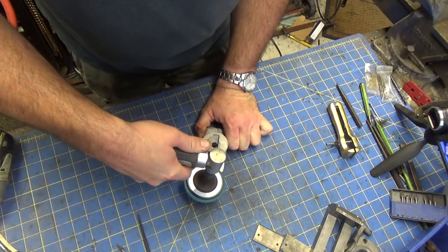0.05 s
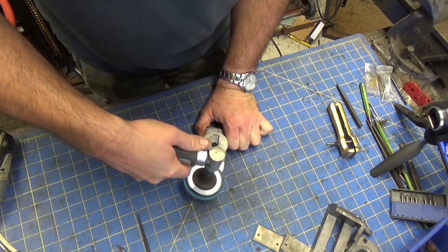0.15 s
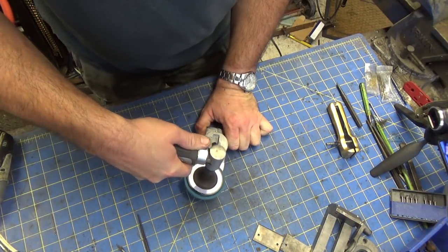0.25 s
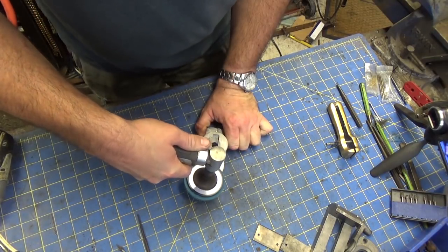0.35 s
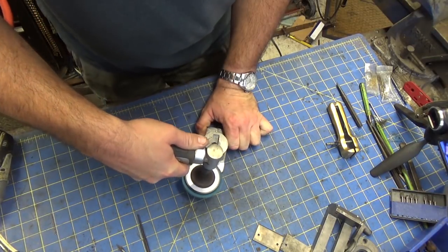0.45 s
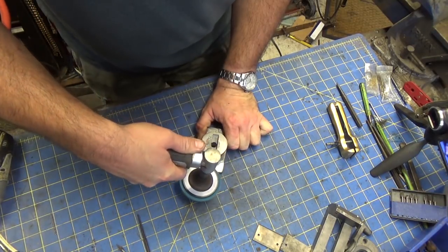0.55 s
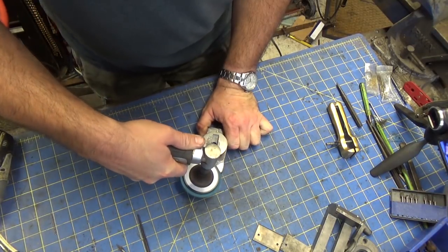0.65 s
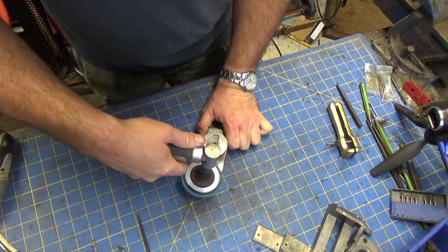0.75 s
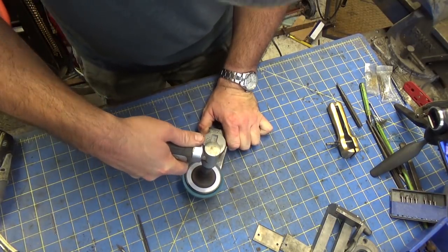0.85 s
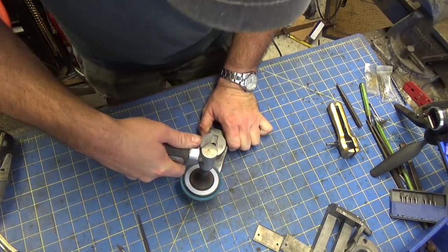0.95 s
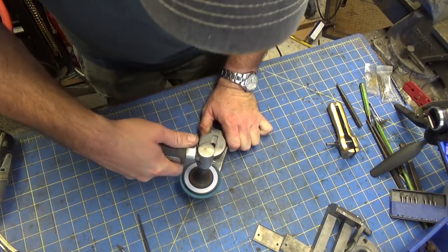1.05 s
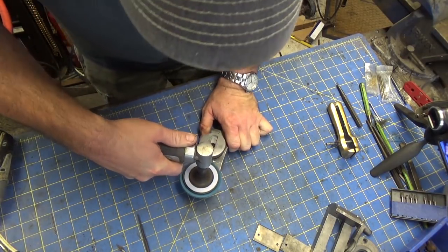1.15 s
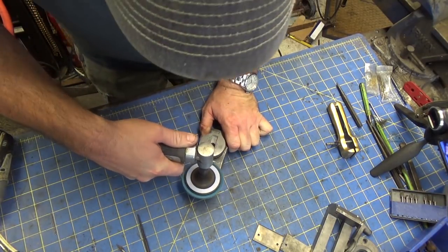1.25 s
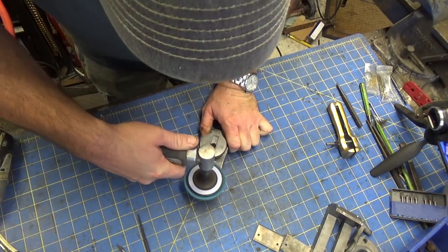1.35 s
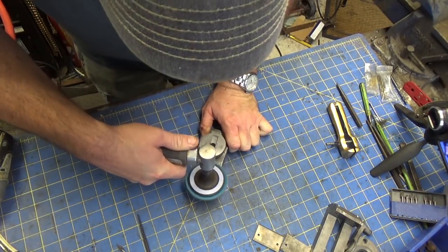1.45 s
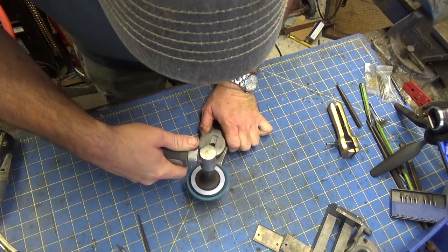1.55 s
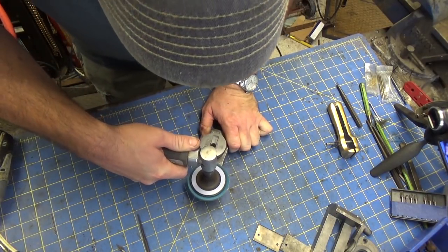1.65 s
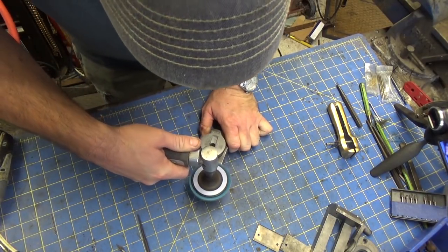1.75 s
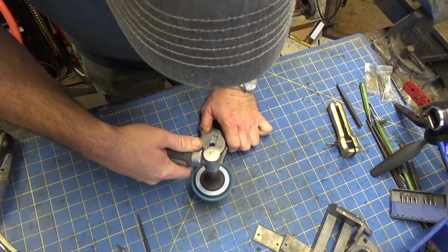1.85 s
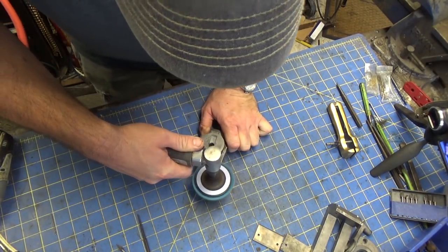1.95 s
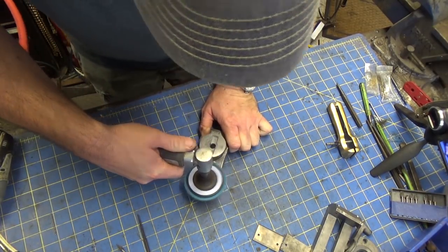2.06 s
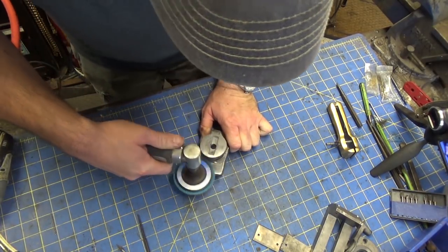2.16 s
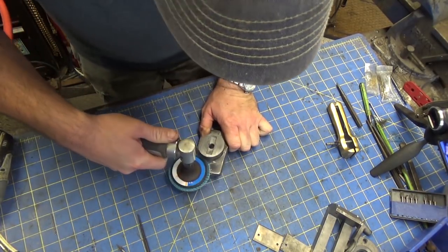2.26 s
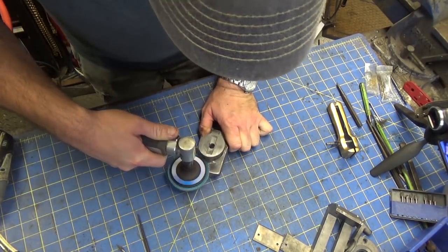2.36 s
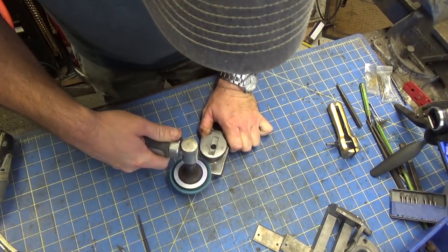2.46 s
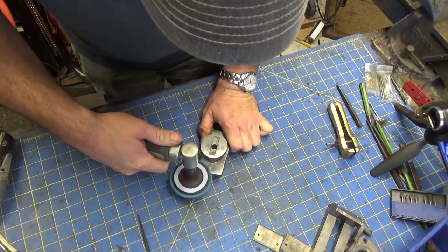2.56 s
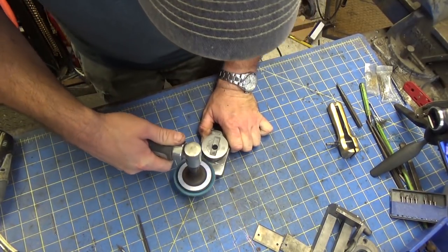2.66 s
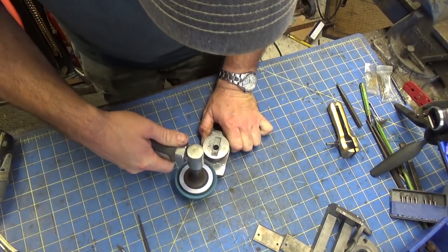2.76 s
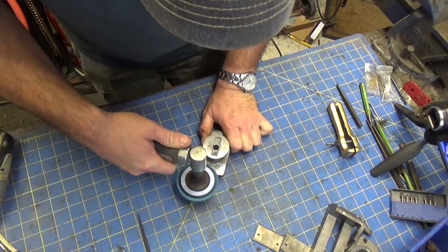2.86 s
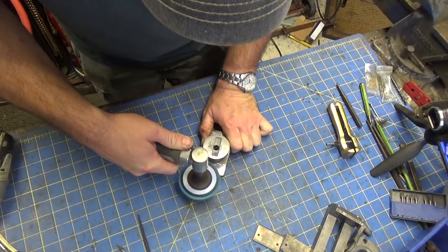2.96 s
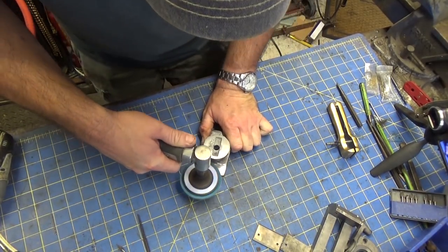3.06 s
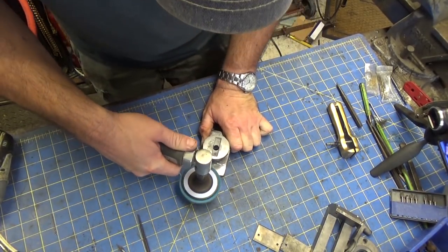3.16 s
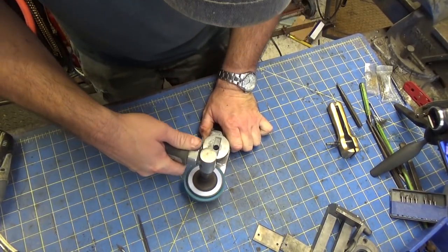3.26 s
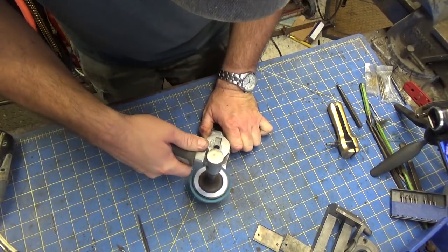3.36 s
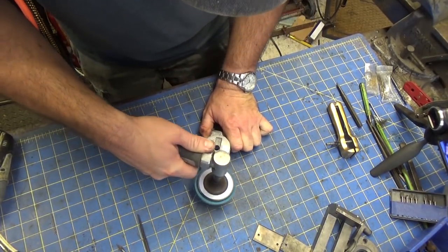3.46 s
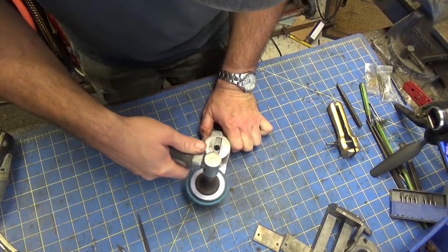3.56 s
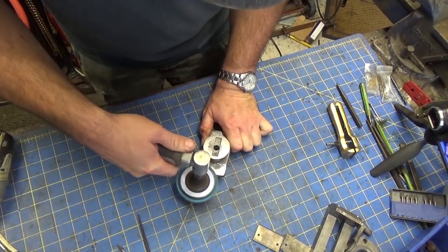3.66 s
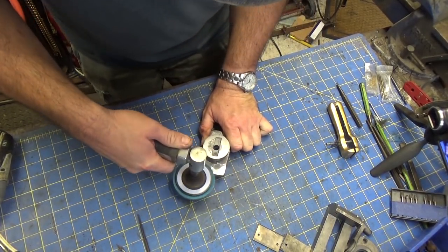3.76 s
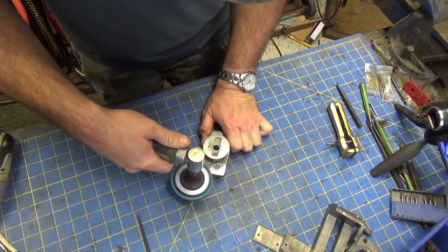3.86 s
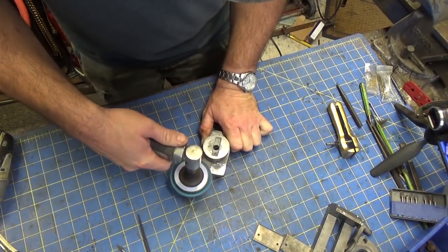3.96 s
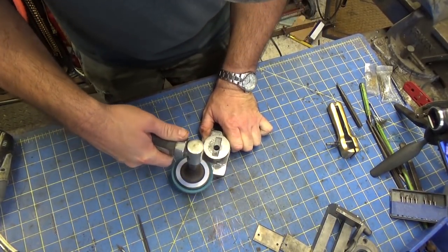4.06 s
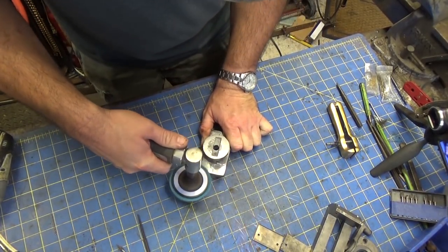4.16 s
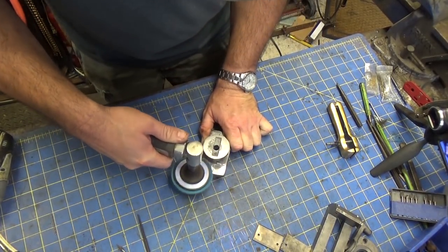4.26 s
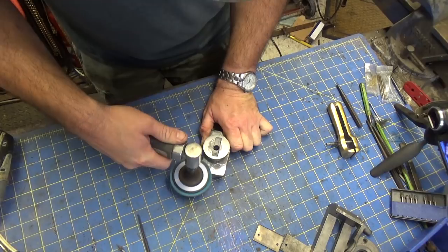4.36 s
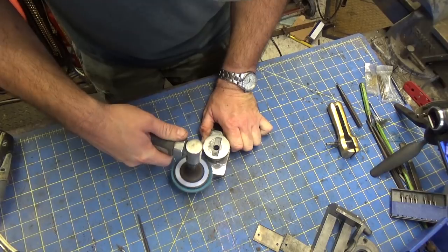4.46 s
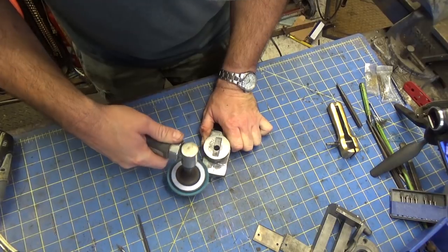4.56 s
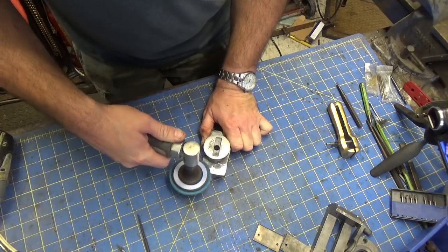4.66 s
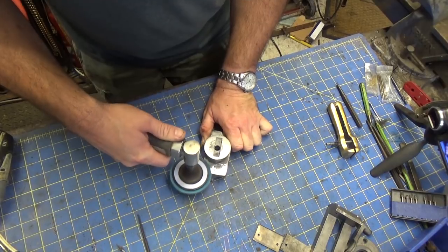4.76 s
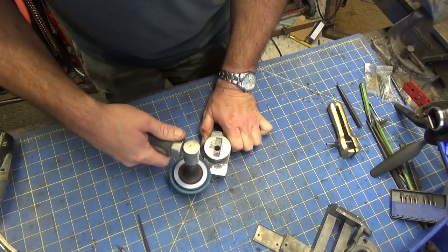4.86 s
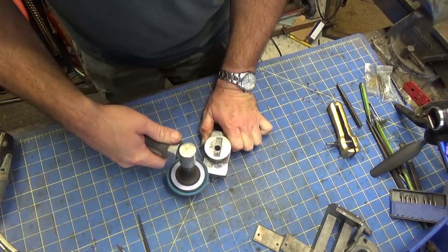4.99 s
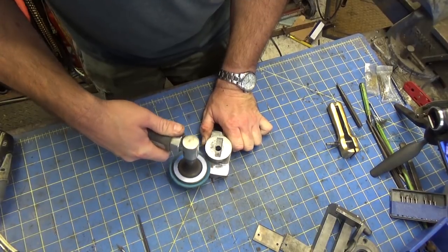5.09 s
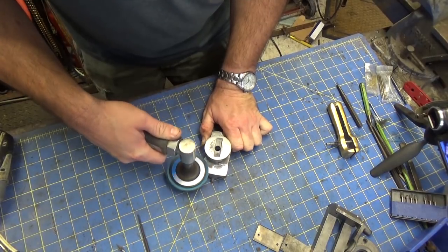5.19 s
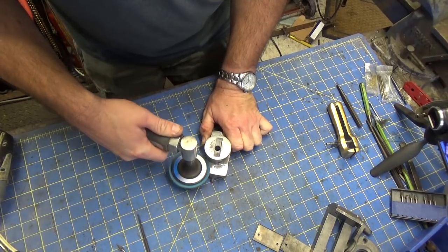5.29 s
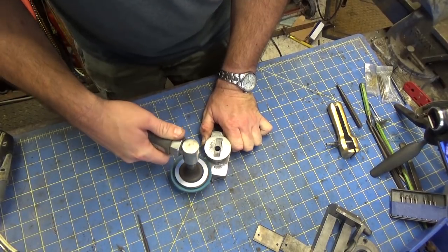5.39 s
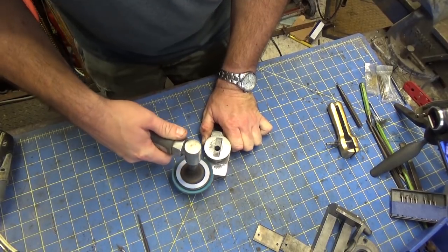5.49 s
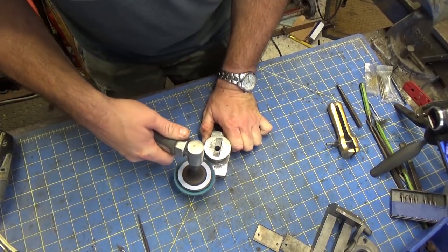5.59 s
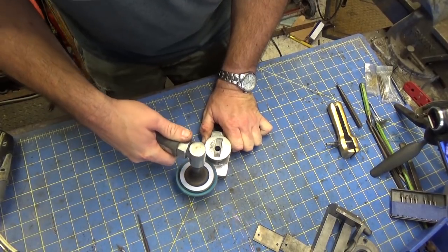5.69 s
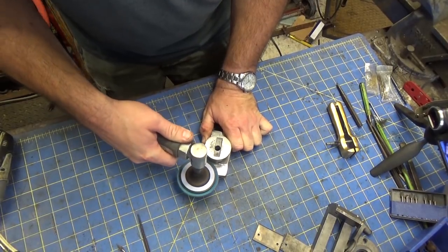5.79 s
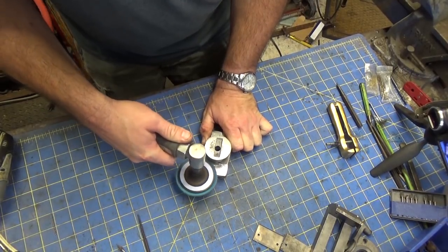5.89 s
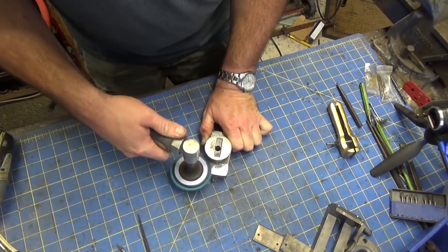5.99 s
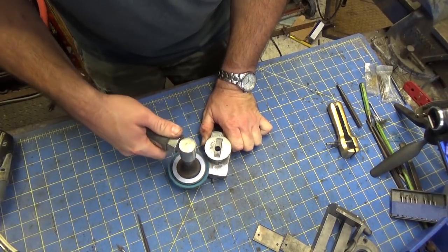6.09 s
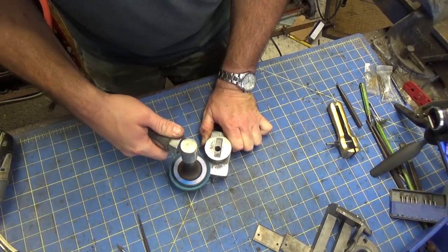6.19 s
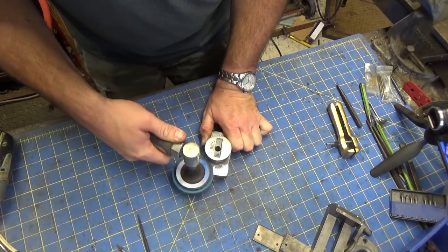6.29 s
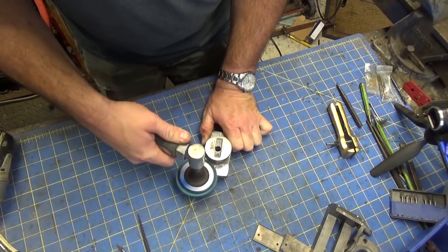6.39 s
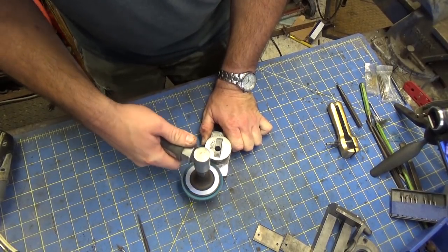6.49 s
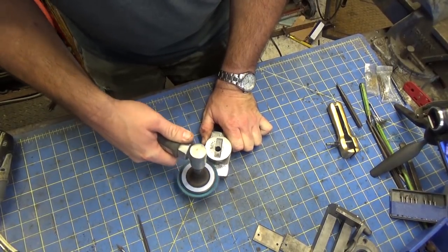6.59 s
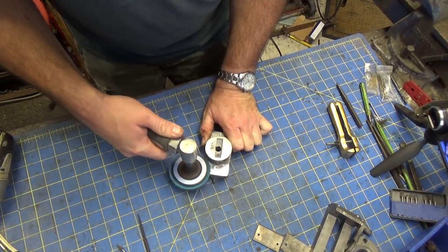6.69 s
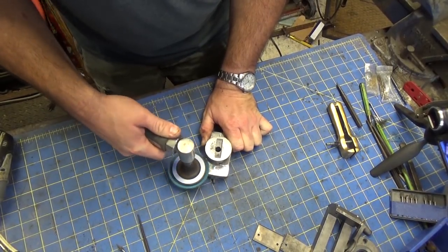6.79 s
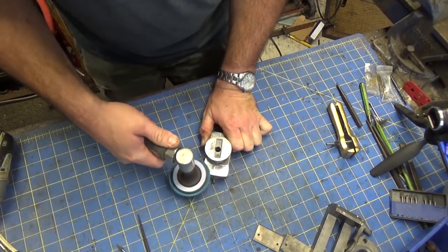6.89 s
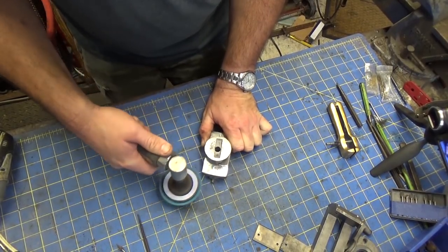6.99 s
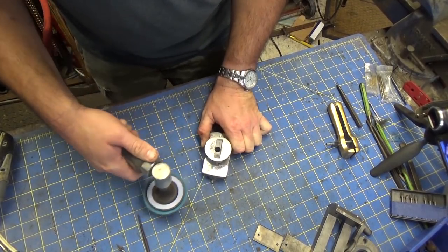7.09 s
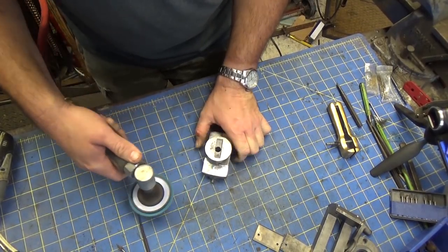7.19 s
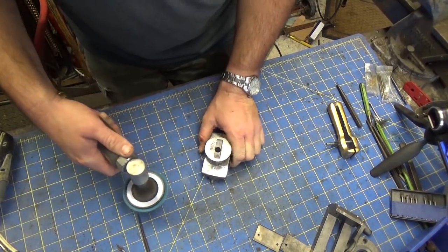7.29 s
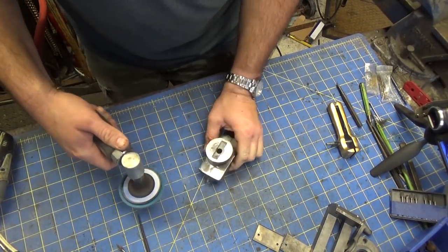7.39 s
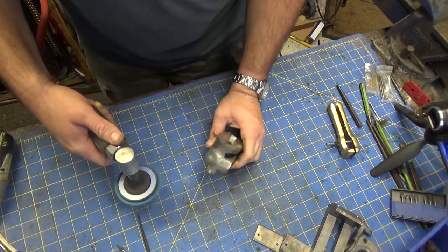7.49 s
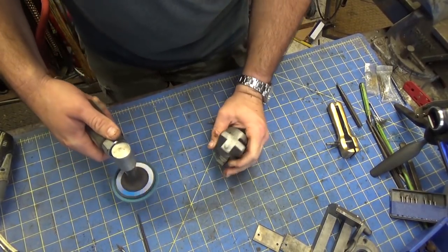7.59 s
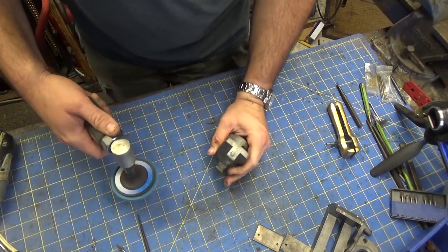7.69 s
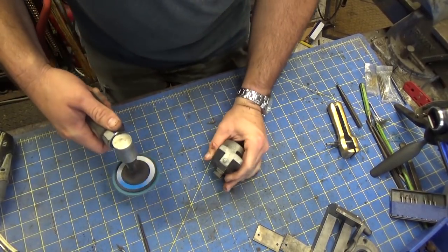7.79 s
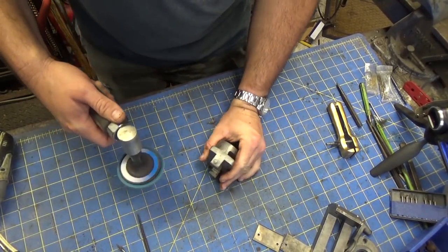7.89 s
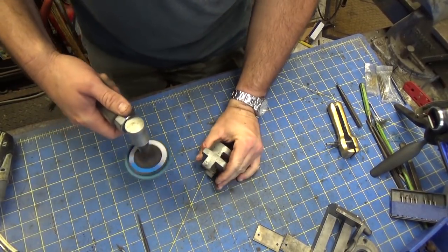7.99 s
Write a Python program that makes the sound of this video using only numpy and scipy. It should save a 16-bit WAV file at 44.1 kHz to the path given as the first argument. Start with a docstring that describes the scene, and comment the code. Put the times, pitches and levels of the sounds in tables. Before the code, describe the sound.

A handheld air grinder hisses loudly and whines, its pitch sagging under load and recovering, then the air shuts off and it rattles down.

```python
"""An air die grinder works a small casting on a bench: its exhaust hisses as filtered noise chopped by the vanes.
The vane motor whines in sine orders of its vane rate, which sags and nearly stalls under load.
The valve shuts and the rotor coasts down: loose vanes rattle as pulsed noise through housing resonances,
with a brief squeal. The steady hum of the workshop, shaped noise, is left. A short room tail surrounds it."""
import sys
import numpy as np
from scipy import signal
from scipy.fft import rfft, irfft, next_fast_len
from scipy.io import wavfile
from scipy.ndimage import uniform_filter1d, map_coordinates

SR = 44100
rng = np.random.default_rng(int(sys.argv[2]) if len(sys.argv) > 2 else 0)


def file_out(sig):
    """Save sig as 16-bit WAV at sys.argv[1]."""
    # one column per channel
    cols = np.atleast_2d(sig).T
    # limit, then scale
    lim = np.clip(cols, -1, 1)
    pcm = np.round(lim * 32767).astype(np.int16)
    wavfile.write(sys.argv[1], SR, pcm)


N = 354547
TIME_S = np.arange(N) / SR
SHUT_S = 7.11  # the valve closes


def amp(db):
    """Decibel law: 20 dB is a factor of ten in amplitude."""
    return 10 ** (np.asarray(db) / 20)


def unit(x):
    """Normalization: scale to a root-mean-square of 1."""
    return x / np.sqrt(np.mean(x ** 2) + 1e-20)


def along(points, hz):
    """Spectral interpolation: (frequency, value) points joined on a log-frequency axis."""
    f, v = np.transpose(points)
    return np.interp(np.log(hz + 1), np.log(f + 1), v)


def curves(rows):
    """Linear interpolation in time: one value per sample for each column after the time."""
    s, *cols = np.transpose(rows)
    return [np.interp(TIME_S, s, c) for c in cols]


def wobble(rate):
    """Slow random modulation: a smooth curve through rate random knots a second."""
    at = np.arange(0, N + 32, 32)
    knots = rng.standard_normal(int(N * rate / SR) + 4)
    return np.interp(np.arange(N), at, map_coordinates(knots, [at * rate / SR]))


def filtered(x, response):
    """Linear filtering: the spectrum is multiplied by a response of frequency."""
    m = next_fast_len(N + SR // 2)
    return irfft(rfft(x, m) * response(np.fft.rfftfreq(m, 1 / SR)), m)[..., :N]


def band(f, hz, width_hz):
    """Damped resonance: a second-order response with peak gain 1."""
    return 1j * f * width_hz / (hz * hz - f * f + 1j * f * width_hz)


def puffs(turn, depth):
    """Periodic flow modulation: white noise swells once per vane pass."""
    return unit(rng.standard_normal(N) * np.exp(depth * np.cos(turn)))


def raised(slow, carrier):
    """Quadrature modulation: two low-passed noises become one noise band around the carrier."""
    return unit(slow[0] * np.cos(carrier) + slow[1] * np.sin(carrier))


def coasting():
    """Valve switching: 0 under air, 1 once the valve has shut, with a 43 ms ramp."""
    return np.clip((TIME_S - SHUT_S) / 0.043, 0, 1)


def streaked(x, depth_db):
    """Shifting reflections off bench, tools and hands: narrow bands swell and fade."""
    z = signal.stft(x, nperseg=512)[2]
    field = uniform_filter1d(rng.standard_normal(z.shape), size=3, axis=0)
    field = uniform_filter1d(field, size=70, axis=1)
    field = uniform_filter1d(field, size=25, axis=1)
    field = field - uniform_filter1d(field, size=14, axis=0)  # broad colour stays as it is
    return signal.istft(z * amp(depth_db * unit(field)), nperseg=512)[1][:N]


# The vane motor sags and recovers as the brush is pressed and eased, before small random snags:
# time_s, vane_rate_hz
MOTOR_SPEED = [(0.0, 495), (0.15, 295.3), (0.26, 311), (0.3, 254.0), (0.41, 261.8), (0.47, 304.7),
               (0.5, 233.7), (0.68, 408.3), (0.81, 533.5), (0.9, 533.0), (1.05, 589.6), (1.14, 607),
               (1.24, 592.0), (1.33, 529), (1.39, 516), (1.5, 342.7), (1.61, 342.6), (1.67, 431),
               (1.8, 374), (1.95, 456.0), (2.06, 479.0), (2.12, 444), (2.17, 378.0), (2.29, 124.0),
               (2.4, 111.0), (2.44, 153.6), (2.51, 165.9), (2.61, 414.0), (2.7, 541.5), (2.94, 534.3),
               (3.02, 616), (3.11, 541.0), (3.22, 472), (3.32, 520), (3.37, 514.0), (3.47, 544),
               (3.58, 609), (3.73, 552), (3.77, 550.0), (3.88, 568.5), (4.01, 633), (4.18, 591),
               (4.35, 634.5), (4.55, 623.0), (4.61, 560.0), (4.7, 500), (4.78, 553), (4.82, 458.0),
               (4.91, 418), (4.97, 454), (5.02, 392.0), (5.06, 398), (5.15, 335), (5.17, 349),
               (5.21, 172.0), (5.3, 135.5), (5.42, 174.0), (5.49, 267), (5.55, 281.0), (5.64, 379.0),
               (5.7, 442.0), (5.81, 481), (5.86, 452), (5.92, 523.0), (6.02, 536), (6.05, 523.0),
               (6.15, 380.7), (6.22, 352.0), (6.27, 241.3), (6.46, 218.6), (6.58, 335.5), (6.67, 427),
               (6.8, 313.5), (6.88, 300.0), (7.01, 435), (7.08, 619), (7.12, 684)]
COAST_S, COAST_BEND = .42, .93  # time to fall by 1/e without air; a bend under 1 is faster at first


def rotor():
    """Rotor dynamics: vane rate and its running phase, loaded under air, then a free run-down."""
    free_s = np.clip(TIME_S - MOTOR_SPEED[-1][0], 0, None)
    hz = curves(MOTOR_SPEED)[0] * np.exp(-(free_s / COAST_S) ** COAST_BEND)
    hz = hz * (1 + 0.00596 * wobble(60))  # the brush snags and frees
    return hz, 2 * np.pi * np.cumsum(hz) / SR


# Bands of the exhaust jet, levels relative: centre_hz, width_hz, level_db, speed_db_per_octave,
# drift_db_per_step, sheen_db_per_step, flare_db
JET_BANDS = [(4023, 830, -38, -1.5, 5.5, 3, 5), (5796, 2900, -31, 1, -4.5, -0.7, 2),
             (8616, 1160, -24, -.6, 2, 1.5, 10), (9640, 1730, -19, 1.4, 0.3, -2, -3),
             (10960, 1730, -23, 1.5, -1.5, 3, .1), (13280, 1400, -33, 1.5, 1, 5, -4),
             (14600, 1100, -37.5, 1, -7, -5.5, .1)]
# Upper bands slide as the paths off bench and body change: time_s, pitch_factor
JET_SLIDE = [(0, 0.95), (.9, 0.95), (1.5, 1.02), (2.1, 1.01), (2.5, 0.97), (3.3, 1.03), (4.4, 1.0),
             (5.3, 1.015), (6.2, 1.1), (7.1, 0.92)]
# Air let through by the valve, relative: time_s, flow_db
VALVE_FLOW = [(0, 1.5), (6.95, 1), (7.03, 1.5), (7.104, -1), (7.113, -10), (7.13, -27), (7.17, -25),
              (7.25, -26.5), (8.04, -53)]
# Tool and hands move and the jet's colour drifts, toward hollow and in the top bands:
# time_s, drift_steps, sheen_steps
JET_AIM = [(0, -0.78, -0.5), (.3, -0.62, -1), (.75, -0.72, 0.3), (1.1, -1.13, 0.5), (1.8, -0.69, 0.3),
           (2.2, .1, 0.6), (2.6, -0.027, 0.1), (3.1, .1, 0), (3.4, -0.59, 0), (4.1, -.4, 0.4),
           (4.6, 0.16, 0.9), (5.3, 0.99, -1), (5.8, .8, .3), (6.3, 1.18, -0.8), (6.65, 0.43, 0.9),
           (7.05, 0.88, -0.6)]
# Broad rush of air through the turning motor and of the brush on metal, relative:
# frequency_hz, density_db_per_hz
RUSH_SPECTRUM = [(410, -84), (700, -26.5), (1440, -23.5), (2080, -19), (2400, -19.5), (3940, -13.5),
                 (4430, -17.5), (6650, -8.5), (9480, 0.5), (11200, -6), (16000, -23)]
# Resonances of the casting under the brush, added to the rush: centre_hz, width_hz, gain_db
CASTING_RINGS = [(1325, 34, -0.5), (1780, 45, -7.5), (2040, 70, -6), (3100, 58, -5), (3480, 41, -10),
                 (3840, 120, -4), (4080, 20, -11), (4670, 100, -0.5), (5090, 75, 0.5), (5900, 43, -4),
                 (6600, 30, -20), (6600, 22, -24)]
FLARE_S = 0.079  # the jet changes colour over this time before the valve is shut


def exhaust(hz, turn):
    """Jet turbulence: bands of noise chopped by the vanes, more deeply at slower turning, over a broad rush."""
    depth = np.clip(.3 - 0.18 * np.log2(hz / 150), 0, 1)
    flow_db = curves(VALVE_FLOW)[0] + 0.055 * wobble(9)
    slide_s = np.cumsum(curves(JET_SLIDE)[0]) / SR
    drift, sheen = curves(JET_AIM)
    octaves = uniform_filter1d(np.log2(hz / 450), size=SR // 8)
    flare = np.clip(1 + (TIME_S - SHUT_S) / FLARE_S, 0, 1)
    jet = 0
    for centre_hz, width_hz, db, speed_db, drift_db, sheen_db, flare_db in JET_BANDS:
        db = db + speed_db * octaves + drift_db * drift + sheen_db * sheen + flare_db * flare
        pair = np.array([puffs(turn, depth), puffs(turn, depth)])
        slow = filtered(pair, lambda f: 1 / (1 + (2 * f / width_hz) ** 2))
        # noise is lifted to the band's centre; only bands above 10 kHz slide
        carrier = 2 * np.pi * centre_hz * (slide_s if centre_hz > 10000 else TIME_S)
        level_db = db - 4 + 0.44 * wobble(7.6) + 0.64 * wobble(22)
        jet = jet + amp(level_db) * raised(slow, carrier)
    jet = filtered(jet, lambda f: 1 / (1 + (2000 / (f + 1)) ** 4))  # the jet carries no bass

    def rush_response(f):
        """Modal superposition: casting resonances stand on the broad rush."""
        rings = sum(amp(db) * abs(band(f, c, w)) ** 2 for c, w, db in CASTING_RINGS)
        return amp(along(RUSH_SPECTRUM, f)) * (1 + rings)

    rush = unit(filtered(puffs(turn, depth), rush_response))
    speed_db = 1.34 * np.log2(hz / 500)  # faster turning moves more air
    # the air left in the motor drains more slowly than the jet dies
    rush_db = .7 * flow_db + speed_db - 21 + .6 * wobble(14)
    return streaked(amp(flow_db) * jet + amp(rush_db) * rush, depth_db=1.5)


# How a motor tone reaches the listener past bench and body, relative: frequency_hz, gain_db
TONE_PATH = [(110, -59), (145, -47), (200, -44), (250, -40), (310, -38.5), (370, -45), (455, -34.5),
             (490, -37.5), (545, -32.5), (588, -36), (608, -46), (630, -52.5), (680, -45), (770, -35.5),
             (900, -41.5), (1070, -38.5), (1170, -43), (1255, -32), (1340, -39), (1450, -40), (1580, -33.5),
             (1680, -38.5), (1780, -29.5), (1880, -34.5), (2100, -33.5), (2400, -46), (2800, -42)]
# Orders of the vane rate, from the first up, relative: level_db, speed_db_per_octave, air_off_gain_db
VANE_ORDERS = [(2.5, -0.1, 2.5), (-10, -1.5, 2), (-12.5, 0, 4), (-21.5, 6, 18), (-31, -2, 20)]
FADE_DB_PER_OCTAVE = 16  # the coasting whine dies with the speed
STALL_HZ, STALL_DB_PER_OCTAVE = 151, 45  # below this rate the whole orders all but stop


def whine(hz, turn):
    """Harmonic orders: sines of the vane rate, and a faint half order from unequal vanes at speed."""
    octaves = np.log2(hz / 550)
    half_db = along(TONE_PATH, hz / 2) - 17 + 3.1 * octaves + 1.45 * wobble(20)
    tone = amp(half_db) * (1 - coasting()) * np.sin(turn / 2)
    stall_db = STALL_DB_PER_OCTAVE * np.minimum(0, np.log2(hz / STALL_HZ))
    for k, (db, slope_db, free_db) in enumerate(VANE_ORDERS, 1):
        level_db = along(TONE_PATH, k * hz) + db + slope_db * octaves
        level_db = level_db + coasting() * (free_db + FADE_DB_PER_OCTAVE * octaves)
        flutter_db = (2.4 if k > 1 else 1.1) * wobble(22)
        tone = tone + amp(level_db + stall_db + flutter_db) * np.sin(k * turn)
    return tone


# The workshop's spectrum, relative: frequency_hz, density_db_per_hz
SHOP_SPECTRUM = [(15, -48), (25, -21), (108, -7), (270, -4.5), (412, -5), (579, -2), (732, -9.5), (985, -8),
                 (1380, -16.5), (4000, -34), (5200, -50), (8800, -120)]


def workshop():
    """Stationary noise: steady distant machinery as spectrally shaped random sound."""
    hum = filtered(rng.standard_normal(N), lambda f: amp(along(SHOP_SPECTRUM, f)))
    return amp(-49.5 + 0.29 * wobble(10)) * unit(hum)


# Reverberation of the room: frequency_hz, t60_s
ROOM_DECAY = [(300, 0.32), (3000, 0.37), (12000, 0.28)]


def room(x):
    """Reverberant decay: each frequency of a noise tail dies at its own speed."""
    hz, t, z = signal.stft(rng.standard_normal(SR // 2), SR, nperseg=256)
    decay = amp(-60 * t / along(ROOM_DECAY, hz)[:, None])
    tail = signal.istft(z * decay, SR, nperseg=256)[1]
    delayed = np.pad(x, (300, 0))  # samples
    return signal.fftconvolve(delayed, tail / np.linalg.norm(tail))[:N]


# The coasting rotor's rattle and the hiss past its bearings, levels relative:
# time_s, rattle_db, hiss_db, hiss_hz
COAST_LEVELS = [(7.12, -26, -27, 8800), (7.2, -36.5, -53, 9540), (7.3, -36.5, -36, 9150),
                (7.46, -39.5, -49, 8680), (7.54, -42.5, -48, 9320), (7.6, -45.5, -56, 9250),
                (8.04, -56, -58, 9120)]
# Housing resonances that the loose vanes ring, relative: centre_hz, width_hz, level_db
HOUSING_MODES = [(2780, 354, 3.5), (4850, 560, 5.5), (5400, 260, 7.5), (6100, 540, 4.5), (8200, 810, -13),
                 (11620, 900, -25)]
# a brief squeal while the rotor slows, with steep edges outside its hold
SQUEAL_S, SQUEAL_HOLD_S, SQUEAL_DB, SQUEAL_EDGE_DB_PER_S = 7.29, .12, -47.5, 606


def rattle(hz, turn):
    """Impact excitation: without air the vanes slap loosely, most distinctly near 120 passes a second."""
    depth = np.clip(.8 - .5 * np.abs(np.log2(hz / 120)), .1, 2) * (1 + .25 * wobble(20))

    def body(f):
        """Modal superposition: housing resonances with alternating sign."""
        return sum((-1) ** k * amp(db) * band(f, c, w) for k, (c, w, db) in enumerate(HOUSING_MODES))

    t = TIME_S - SQUEAL_S
    outside_s = np.maximum(0, np.maximum(-t, t - SQUEAL_HOLD_S))
    squeal = unit(filtered(puffs(turn, 0.35), lambda f: band(f, 3023, 90) ** 2))
    squeal = amp(SQUEAL_DB - SQUEAL_EDGE_DB_PER_S * outside_s) * squeal
    # the wheel stirs air
    wind = unit(filtered(rng.standard_normal(N), lambda f: band(f, 1980, 1500) ** 2))
    wind = amp(-45.0 + 11.0 * np.log2(hz / 600)) * wind
    rattle_db, hiss_db, hiss_hz = curves(COAST_LEVELS)
    pair = np.array([puffs(turn, .2), puffs(turn, .2)])
    slow = filtered(pair, lambda f: 1 / (1 + (f / 600) ** 4))
    carrier = 2 * np.pi * np.cumsum(hiss_hz) / SR
    hiss = amp(hiss_db - 3.5 + 2.5 * wobble(40)) * raised(slow, carrier)
    slaps = amp(rattle_db - 3 + 1.38 * wobble(50)) * unit(filtered(puffs(turn, depth), body))
    return coasting() * (slaps + hiss + wind) + squeal


# Filter on the side signal of room and workshop: frequency_hz, gain_db
SIDE_GAIN = [(60, -26), (92, -24), (140, -26), (210, -16), (330, -10), (500, -9), (770, -4.5), (1170, -3),
             (1790, -21), (2740, -113), (4190, -27), (6410, -12.5), (9810, -19.5), (15000, -47)]


def scene():
    """Mid-side superposition: channels alike, apart from a little room and workshop sound."""
    hz, turn = rotor()
    tone = whine(hz, turn)
    air = exhaust(hz, turn) + rattle(hz, turn)
    mid = tone + air + amp(-11.5) * room(tone + air) + workshop()
    side = room(air + amp(-15) * tone) + workshop()
    side = filtered(side, lambda f: amp(along(SIDE_GAIN, f)))
    return np.array([mid + side, mid - side]) * amp([[.1], [-.1]])  # slight balance in dB


TOP_HZ = 15760  # band limit


def record(dry):
    """Dynamic compression: gain falls as smoothed level rises, peaks are rounded, the top is cut."""
    keep = np.exp(-1 / (.15 * SR))  # 0.15 s averaging
    power = np.mean(dry ** 2, axis=0)
    level = signal.lfilter([1 - keep], [1, -keep], power, zi=[np.mean(power[:SR // 2])])[0]
    loud = dry * amp(-.16 * (10 * np.log10(level + 1e-9) + 12.5))
    rounded = loud / (1 + np.abs(loud / .68) ** 6) ** (1 / 6)
    return filtered(rounded, lambda hz: hz < TOP_HZ)


dry = scene()
out = record(dry)
file_out(out)
```